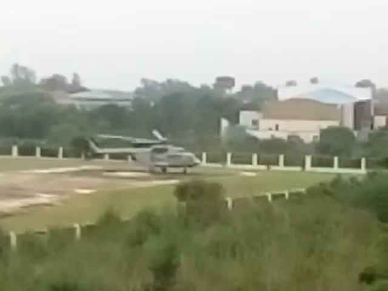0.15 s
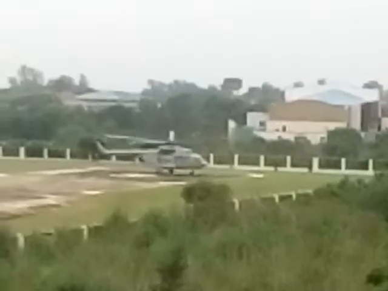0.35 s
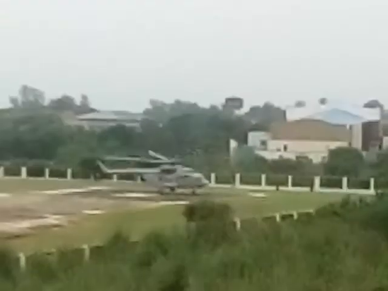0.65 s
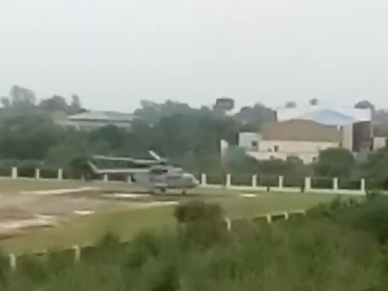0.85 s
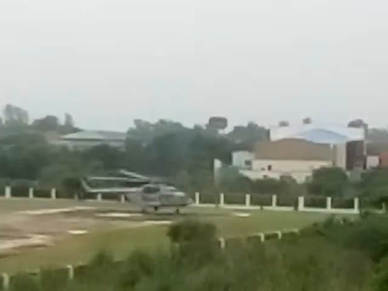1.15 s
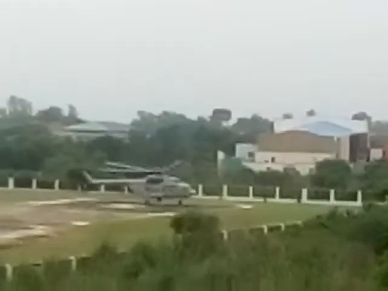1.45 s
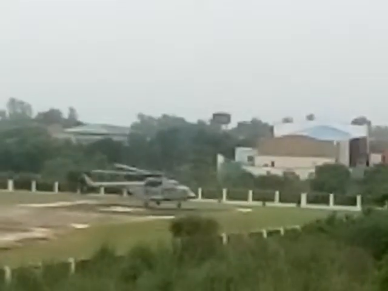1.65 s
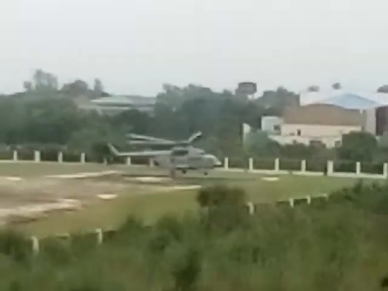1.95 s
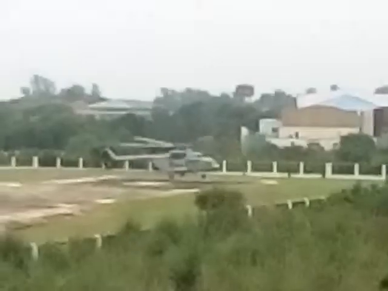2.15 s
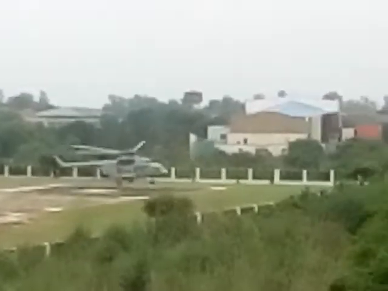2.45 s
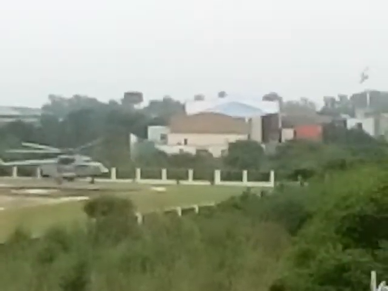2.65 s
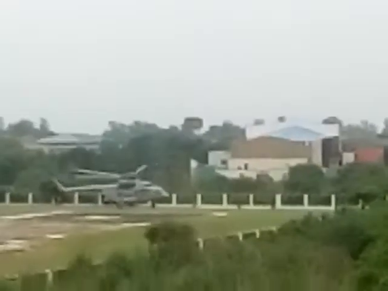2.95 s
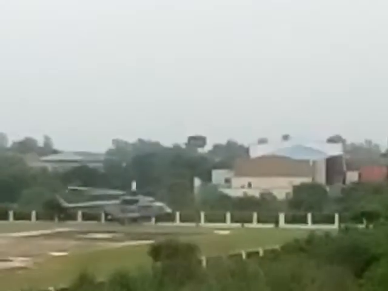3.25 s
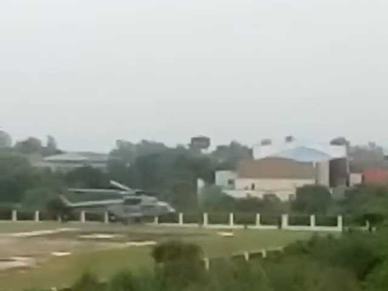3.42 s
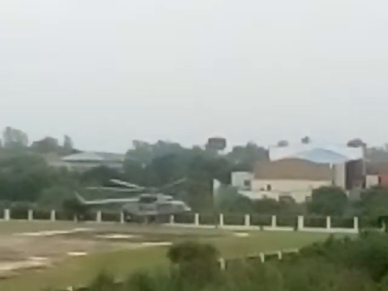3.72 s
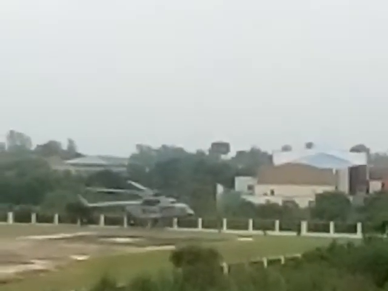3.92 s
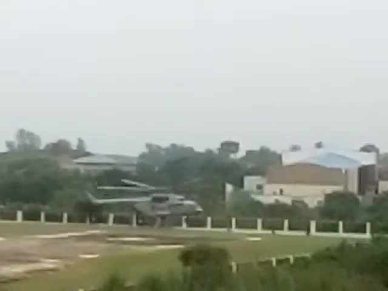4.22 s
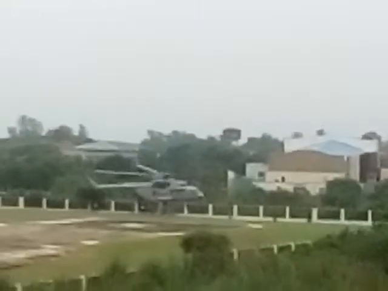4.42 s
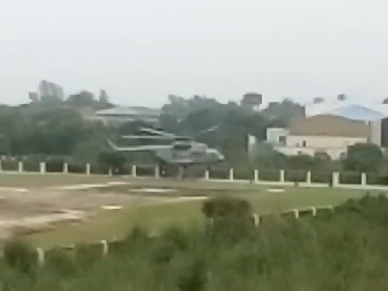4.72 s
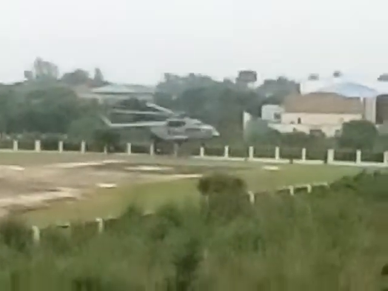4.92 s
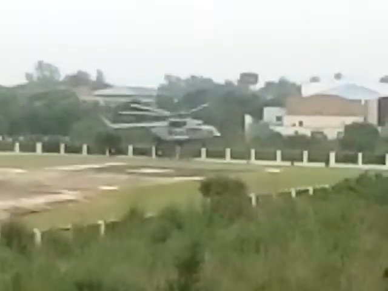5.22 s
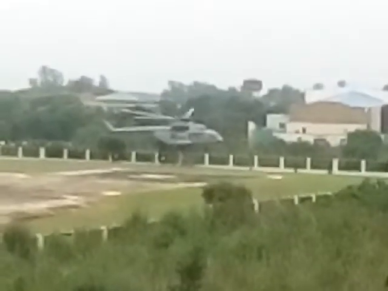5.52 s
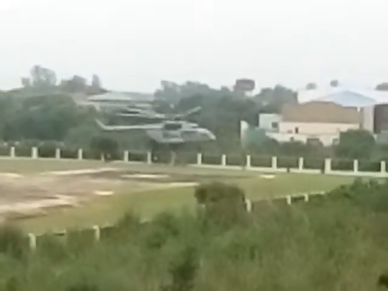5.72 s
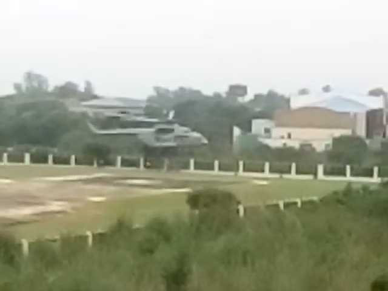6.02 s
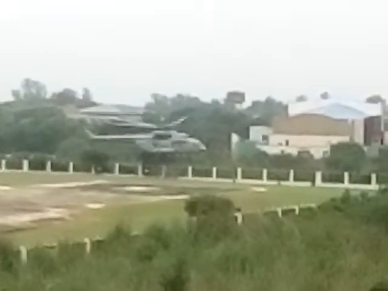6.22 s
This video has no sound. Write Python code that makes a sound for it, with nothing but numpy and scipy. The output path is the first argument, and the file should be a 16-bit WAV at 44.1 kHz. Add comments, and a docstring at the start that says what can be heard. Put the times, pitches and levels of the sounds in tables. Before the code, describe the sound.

A large helicopter idles at some distance in an open field. From 0 to 1 s its rapid throb, about sixteen blade swishes a second, is clear, with a faster tail-rotor flutter, low hum, thin gear whines and soft turbine hiss; a few very faint, falling bird chirps pass. From about 1.2 s wind strikes the microphone, with low rumbling bursts, fluttering edges and short dull thumps, irregular and close, far louder than the machine. Between 2 and 4 s small blade slaps crack through, most clustered around 3.2-3.6 s, and a rasping flare near 3.1 s and a hissy one near 3.55 s swell and sink. From 4.5 s a rounded chopping beat emerges as it lifts off, strongest around 4.8-5.5 s. Roar, whine and hiss then grow brighter and fuller to the end at 6.4 s, under dense, hard wind buffeting, with a few more faint chirps.

```python
"""A heavy helicopter lifts off: main and tail blades modulate coloured noise into a throbbing roar.
Slaps and a beat per blade at lift-off are noise bursts; hum and gears are wavering sines.
Turbine hiss is noise in patchy bands; compressor whistles are smeared sines, and bands of engine noise flare.
Wind noise in gusts and short thumps buffets the microphone; faint bird chirps are falling sines.
"""
import sys
import numpy as np
from scipy import signal
from scipy.fft import rfft, irfft, next_fast_len
from scipy.io import wavfile
from scipy.ndimage import uniform_filter1d, minimum_filter1d

SR = 44100
rng = np.random.default_rng(int(sys.argv[2]) if len(sys.argv) > 2 else 0)


def unload_wav(signal):
    """Save mono or channel-first audio to the path in sys.argv[1] as 16-bit WAV at rate SR, clipped to [-1, 1]."""
    wavfile.write(
        sys.argv[1],
        SR,
        np.round(np.clip(np.atleast_2d(signal).T, -1, 1) * 32767).astype(np.int16),
    )


N = 280917
TIME = np.arange(N) / SR


def undb(db):
    """Decibels to gain."""
    return 10 ** (np.asarray(db) / 20)


def curves(table):
    """Interpolate each column of a (time_s, ..) table at every sample."""
    time_s, *columns = np.transpose(table)
    return [np.interp(TIME, time_s, column) for column in columns]


def unit(x):
    """Scale to rms 1."""
    return x / np.sqrt(np.mean(x ** 2))


def steady(x, size):
    """Level out slow swings: divide by the moving rms over size samples."""
    return x / np.sqrt(uniform_filter1d(x ** 2, size=size) + 1e-9)


def white():
    """White noise of rms 1."""
    return rng.standard_normal(N)


def walk(rate_hz):
    """Smooth random drift of rms 1 through rate_hz knots a second."""
    knots = white()
    drift = np.interp(TIME * rate_hz, np.arange(N), knots)
    return unit(uniform_filter1d(drift, max(int(SR / rate_hz / 2), 1)))


def colour(x, spectrum):
    """Minimum-phase filter with a (freq_hz, level_db) response that keeps the power of white noise."""
    size = 2 * next_fast_len(N // 2 + 4096)
    freq_hz, level_db = np.transpose(spectrum)
    bins_hz = np.maximum(np.arange(size // 2 + 1) * SR / size, 1)
    response_db = np.interp(np.log(bins_hz), np.log(freq_hz), level_db)
    cepstrum = irfft(np.log(unit(undb(response_db))))
    # fold the cepstrum so that the filter is causal
    cepstrum[1:size // 2] *= 2
    cepstrum[size // 2 + 1:] = 0
    response = np.exp(rfft(cepstrum))
    return irfft(rfft(x, size) * response, size)[:N]


# bird calls: start_s, level_db
CHIRPS = [(0.325, -74), (0.64, -70), (0.96, -72), (1.597, -68), (4.733, -67), (4.798, -69), (4.922, -70),
          (5.047, -64), (5.235, -72), (5.362, -73), (5.42, -72), (5.675, -65), (5.745, -61), (5.98, -72),
          (6.052, -70), (6.3, -60.5)]
CHIRP_TOP_HZ, CHIRP_FALL_S, CHIRP_LENGTH_S = 11000, .055, .045
CHIRP_SMEAR_HZ, CHIRP_FLICKER_DB = 420, 4


def chirps():
    """Small bird, faint: sines fall exponentially in pitch, blurred and broken on their way."""
    out = 0
    smear_hz = CHIRP_SMEAR_HZ * walk(1500)
    for start_s, level_db in CHIRPS:
        age_s = np.clip(TIME - start_s, 0, CHIRP_LENGTH_S)
        pitch_hz = CHIRP_TOP_HZ * np.exp(-age_s / CHIRP_FALL_S) + smear_hz
        envelope = np.abs(np.sin(np.pi * age_s / CHIRP_LENGTH_S)) ** .5
        out = out + undb(level_db) * envelope * np.sin(2 * np.pi * np.cumsum(pitch_hz) / SR)
    return out * steady(undb(CHIRP_FLICKER_DB * walk(150)), size=SR // 20)


GUST_ATTACK_S, GUST_RELEASE_S = 0.016, 0.022


def gust(start_s, length_s):
    """Gust envelope: linear attack, hold, exponential release."""
    age_s = TIME - start_s
    attack = np.clip(age_s / GUST_ATTACK_S, 0, 1)
    return attack * np.exp(-np.clip((age_s - length_s) / GUST_RELEASE_S, 0, 20))


# breeze between gusts: time_s, level_db
BREEZE = [(0, -36), (0.3, -49), (1.1, -44), (1.35, -26), (1.48, -26.5), (1.6, -21), (2.0, -22), (2.2, -28),
          (2.5, -20.5), (3.5, -22.5), (3.65, -25), (4.55, -22), (5.05, -32), (5.4, -25.5), (6.37, -22)]
# gusts at the microphone: start_s, length_s, level_db, edge_db (flutter over rumble, before trim)
GUSTS = [(0.925, 0.048, -40, -6), (1.102, 0.066, -32.5, -7), (1.208, 0.073, -17.5, -0.5),
         (1.286, 0.058, -17.5, 0.5), (1.374, 0.05, -23, -8), (1.587, 0.088, -16.5, -1.5),
         (1.68, 0.024, -21, -3), (1.73, .12, -14.5, -2), (1.868, 0.044, -26, -13),
         (2.275, 0.017, -12, -1.5), (2.307, 0.048, -12.5, 1), (2.38, 0.12, -18.5, 6),
         (2.501, 0.047, -14.5, -1), (2.588, 0.02, -14.5, 0), (2.655, .075, -25.5, 4),
         (2.806, 0.028, -16.5, -1), (2.844, 0.036, -12.5, -1.5), (2.909, 0.046, -18, -1),
         (3.048, 0.086, -19.5, 4.5), (3.167, 0.017, -14.5, 0), (3.223, 0.068, -15.5, -1),
         (3.312, 0.054, -16, -3), (3.769, 0.019, -17, 3.5), (3.835, 0.06, -18, -4.5),
         (4.063, 0.15, -20.5, -4), (4.192, 0.091, -19.5, 3.5), (4.313, 0.13, -15.5, 1),
         (4.488, 0.045, -25, -1), (4.758, 0.026, -17.5, -0.5), (4.81, 0.021, -20.5, 11),
         (4.842, 0.017, -23.5, 11), (4.887, 0.028, -15.5, -0.5), (5.104, 0.18, -24, 4.5),
         (5.256, 0.028, -14.5, 0), (5.285, 0.063, -10.5, 3.5), (5.381, 0.056, -16, 6),
         (5.452, 0.13, -19.5, -0.5), (5.71, 0.022, -20, -3), (5.758, 0.024, -18.5, 13.5),
         (5.907, 0.11, -14.5, 3), (6.012, 0.06, -10, 3.5), (6.072, 0.027, -14.5, -1.5),
         (6.151, 0.032, -17.5, 4.5), (6.22, 0.039, -18.5, 6), (6.29, 0.032, -13, 4),
         (6.329, 0.053, -13.5, 8.5)]
# rumble spectrum: freq_hz, relative_db (per Hz)
RUMBLE = [(22, -12), (38, -23), (60, -10), (90, -1), (150, 4), (250, 0.5), (400, -6), (600, -16),
          (1000, -33), (2500, -56.5), (9000, -86.5)]
# flutter spectrum: freq_hz, relative_db (per Hz)
FLUTTER = [(60, -25.5), (200, 2), (350, 0), (550, -3.5), (900, -11.5), (1400, -24.5), (2500, -37.5),
           (9000, -86)]
BREEZE_EDGE_DB = -1  # flutter over rumble, before trim


def wind():
    """Eddies over the microphone port: deep rumble, and brighter flutter where they tear."""
    breeze_db, = curves(BREEZE)
    flows = [(undb(breeze_db), BREEZE_EDGE_DB)]
    for start_s, length_s, level_db, edge_db in GUSTS:
        flows.append((undb(level_db) * gust(start_s, length_s), edge_db))
    # flows add in power, which also weights their edge
    power = sum(flow ** 2 for flow, _ in flows)
    edge_db = sum(flow ** 2 * edge for flow, edge in flows) / power
    eddies = steady(undb(1.3 * walk(70) + 1.5 * walk(220)), size=SR // 40)
    pressure = np.sqrt(power) * eddies
    rumble = steady(colour(white(), RUMBLE), size=SR // 40) * undb(-1.2 - edge_db / 2)
    flutter = steady(colour(white() * eddies ** 1.6, FLUTTER), size=SR // 50) * undb(-6.0 + edge_db)
    return pressure * (rumble + flutter) * undb(0.5 * walk(16))


# single eddies at the microphone: centre_s, level_db, pitch_hz
THUMPS = [(0.833, -14, 400), (1.264, -8.5, 380), (1.325, -11, 230), (1.408, -11.5, 296), (1.564, -5.5, 230),
          (1.642, -7, 350), (1.771, -6, 310), (1.782, -8, 520), (2.299, -6, 260), (2.334, -8, 656),
          (2.351, -10, 400), (2.489, -4.5, 268), (2.547, -13.5, 600), (2.608, -9, 200), (2.63, -10.5, 235),
          (2.778, -5, 230), (2.823, -11, 239), (2.866, -3.5, 390), (2.877, -8.5, 266), (2.954, -8, 290),
          (3.073, -5.5, 330), (3.244, -5, 230), (3.279, -4.5, 264), (3.328, -9.5, 267), (3.472, -12.5, 300),
          (3.844, -11.5, 283), (3.986, -14, 140), (4.095, -8, 387), (4.379, -8.5, 295), (4.4, -8.5, 485),
          (4.825, -10.5, 815), (4.904, -6.5, 250), (5.289, -8, 483), (5.31, -5, 288), (5.332, -11, 288),
          (5.337, -4, 750), (5.347, -12, 350), (5.362, -7, 292), (5.424, -4, 318), (5.509, -8, 270),
          (5.593, -11, 295), (5.638, -11, 200), (5.731, -6.5, 307), (5.777, -13, 440), (5.926, -9, 355),
          (5.96, -8, 560), (6.024, -6, 520), (6.05, -6.5, 420), (6.066, -6.5, 390), (6.099, -5, 284),
          (6.137, -9, 210), (6.165, -8.5, 263), (6.269, -9, 414), (6.319, -9, 300), (6.352, -3, 420)]
THUMP_CYCLES = .75  # half-width at 1/e


def thumps():
    """A lone eddy rocks the diaphragm for a cycle or two: a sine under a Gaussian."""
    out = 0
    for centre_s, level_db, pitch_hz in THUMPS:
        cycles = (TIME - centre_s) * pitch_hz
        envelope = np.exp(-np.minimum((cycles / THUMP_CYCLES) ** 2, 50))
        out = out + undb(level_db) * np.sin(2 * np.pi * cycles) * envelope
    return out


def tone(pitch_hz, waver_hz):
    """A sine whine that wavers in pitch and fades in and out."""
    wavering_hz = pitch_hz * (1 + 0.000708 * walk(3)) + waver_hz * walk(60)
    turns = np.cumsum(wavering_hz) / SR
    fading = undb(2.6 * walk(14) + 1.5 * walk(60))
    return unit(np.sin(2 * np.pi * turns) * fading)


def whistle(pitch_hz):
    """Turbulent air smears a compressor tone into a narrow, grainy band that comes and goes."""
    turns = np.cumsum(pitch_hz + 85 * walk(500)) / SR
    fading = undb(2.6 * walk(90) + 2.2 * walk(16) - 2.5)
    return np.sqrt(2) * np.sin(2 * np.pi * turns) * fading


FADE_BAND_HZ, FADE_RATE_HZ, FADE_DB = 500, 11, 1.7


def patchy(x):
    """Moving air fades overlapping treble bands separately."""
    size = next_fast_len(N)
    spectrum = rfft(x, size * 2)
    freq_hz = np.linspace(0, SR / 2, size + 1)
    out = x
    for centre_hz in np.arange(3500, 7500, FADE_BAND_HZ):
        triangle = np.maximum(1 - np.abs(freq_hz - centre_hz) / FADE_BAND_HZ, 0)
        band = irfft(spectrum * triangle)[:N]
        out = out + band * (undb(FADE_DB * walk(FADE_RATE_HZ)) - 1)
    return out


# gearbox and compressor tones: ground_hz, air_hz, ground_db, air_db
WHINE = [(900, 900, -51, -49), (990, 990, -51, -49), (1690, 1680, -72, -57), (1834, 1834, -53, -66),
         (2056, 2056, -70, -58), (2480, 2480, -59, -57), (3660, 3748, -68, -63), (5636, 5636, -75, -62)]
# compressor blade tone: time_s, pitch_hz, level_db (before fading)
SPOOL = [(0, 11240, -74), (1.1, 11450, -75), (1.3, 11500, -84), (2.0, 11660, -83), (2.3, 11730, -78),
         (3.5, 11680, -80), (3.8, 11660, -85), (4.4, 11620, -82), (5.0, 11650, -76), (5.8, 11700, -74),
         (6.4, 11670, -79)]
# hiss spectrum: freq_hz, relative_db (per Hz)
HISS = [(2000, -4.5), (3700, 0.5), (4250, -6.5), (4800, -4.5), (5150, -0.5), (5400, 1.5), (5700, 2.5),
        (6350, -6), (6550, -11.5), (6900, -16.5), (8000, -24), (9000, -26.5), (10200, -27.5),
        (12000, -31.5), (15000, -43.5)]
NEXT_STAGE_RATIO, NEXT_STAGE_DB = 1.103, -14  # next compressor stage: more blades, higher whistle


def engines(hiss_db):
    """Turbine hiss, compressor whistles, and gear tones that change weight as the machine lifts off."""
    # time_s, airborne share
    airborne, = curves([(2.0, 0.13), (3.0, 0.46), (4.5, 0.47), (5.0, 1)])
    spool_hz, spool_db = curves(SPOOL)
    gears = 0
    for ground_hz, air_hz, ground_db, air_db in WHINE:
        pitch_hz = ground_hz + airborne * (air_hz - ground_hz)
        level_db = ground_db + airborne * (air_db - ground_db)
        gears = gears + tone(pitch_hz, waver_hz=8.76) * undb(level_db)
    hiss = patchy(colour(white() * undb(1.6 * walk(150)), HISS))
    hiss = hiss * undb(hiss_db + 3.0 + 1.0 * walk(30))
    compressor = whistle(spool_hz) + undb(NEXT_STAGE_DB) * whistle(NEXT_STAGE_RATIO * spool_hz)
    return gears + hiss + undb(spool_db) * compressor


TAIL_PER_MAIN = 3.5  # tail blade passes per main blade pass
# tail rotor hum: multiple (of its blade rate), level_db (before fading)
TAIL_HUM = [(2, -43.5), (3, -47.5), (4, -44), (6, -44), (7, -46.5), (9, -49)]


def tail_hum(phase):
    """Low harmonics of the tail rotor, fading in and out with the air."""
    out = 0
    for multiple, level_db in TAIL_HUM:
        fading = undb(level_db + 0.71 * walk(11.0))
        angle = 2 * np.pi * multiple * TAIL_PER_MAIN * phase + .5 * walk(13.0)
        out = out + fading * np.sqrt(2) * np.sin(angle)
    return out


def swish(phase, rise, fall):
    """Once a blade: swells as it advances, fades as it turns away (rise, fall in cycles)."""
    cycle = phase % 1
    return np.exp(-cycle / fall) + np.exp((cycle - 1) / rise)


# engine sound carried over by the wind:
# centre_s, length_s (half-width at 1/e), centre_hz, width_hz, level_db, chopped (tail rotor share, 0-1)
FLARES = [(3.06, 0.085, 950, 270, -31, .9), (3.08, .27, 4550, 900, -60, 0), (3.55, 0.09, 4950, 800, -54, 0),
          (3.89, .04, 4400, 800, -57, 0), (5.945, 0.035, 5625, 80, -50, 0), (6.05, .08, 5650, 110, -56, 0)]


def flares(phase):
    """Narrow noise bands, whine or tail rotor rasp, that swell and sink again."""
    rasp = unit(swish(TAIL_PER_MAIN * phase, rise=.12, fall=.2))
    out = 0
    for centre_s, length_s, centre_hz, width_hz, level_db, chopped in FLARES:
        band_shape = [(centre_hz - 1.5 * width_hz, -90), (centre_hz - width_hz / 2, 0),
                      (centre_hz + width_hz / 2, 0), (centre_hz + 1.5 * width_hz, -90)]
        band = steady(colour(white(), band_shape), size=SR // 50)
        swell = undb(level_db) * np.exp(-((TIME - centre_s) / length_s) ** 2)
        out = out + swell * band * (1 + chopped * (rasp - 1))
    return out


def burst(start_s, rise_s, fall_s):
    """Envelope with a linear rise and an exponential fall, top 1."""
    age_s = np.maximum(TIME - start_s, 0)
    return np.minimum(age_s / rise_s, 1) * np.exp(-np.clip((age_s - rise_s) / fall_s, 0, 20))


# a blade cuts a stray vortex: start_s, level_db
SLAPS = [(1.95, -26), (2.478, -26.5), (2.68, -28.5), (2.923, -26.5), (3.159, -26), (3.231, -26.5),
         (3.28, -22), (3.404, -22), (3.599, -21.5), (3.921, -25.5)]
# slap spectrum: freq_hz, relative_db (per Hz)
SLAP_COLOUR = [(200, -7), (900, 14), (1600, -5), (2600, 5.5), (3800, -13), (9000, -57)]
SLAP_RISE_S, SLAP_FALL_S = 0.0019, 0.0033


def slaps():
    """Stray cracks of blade on vortex: short bursts of coloured noise."""
    strays = sum(undb(level_db) * burst(start_s, SLAP_RISE_S, SLAP_FALL_S) for start_s, level_db in SLAPS)
    return colour(white() * strays, SLAP_COLOUR)


# blade beats at lift-off: time_s, level_db
CHOP = [(4.2, -60), (4.48, -37), (4.66, -38), (4.78, -29.5), (4.86, -34), (4.98, -33), (5.05, -29),
        (5.48, -29), (5.55, -32.5), (5.75, -35), (5.85, -40), (6.37, -40)]
# chop spectrum: freq_hz, relative_db (per Hz)
CHOP_COLOUR = [(200, -5.5), (600, 6.5), (950, 7), (1200, -5.5), (1350, -7.5), (1680, 0), (1880, -7),
               (2060, 1.5), (2250, -6.5), (2480, 6), (3000, -5), (3550, -23.5), (3850, -17), (9000, -54)]
CHOP_AT_CYCLE, CHOP_WIDTH_S = .072, .0095  # half-width at 1/e


def chop(phase):
    """At lift-off every blade cuts the vortex of the one before: an even, rounded noise beat."""
    chop_db, = curves(CHOP)
    offset_cycles = (phase - CHOP_AT_CYCLE + .5) % 1 - .5
    offset_s = offset_cycles / np.gradient(phase) / SR
    beat = np.exp(-(offset_s / CHOP_WIDTH_S) ** 2)
    return steady(colour(white(), CHOP_COLOUR), size=SR // 200) * beat * undb(chop_db)


# blade bite: time_s, swish_db (relative to the churn, before trim)
BITE = [(0, -5.5), (1.1, -5.5), (2.0, -8), (3.2, -4), (4.3, -5), (4.8, -5), (5.4, -5), (5.8, -6.5),
        (6.3, -7)]
# churn spectrum: freq_hz, relative_db (per Hz)
ROAR = [(30, -28), (55, -11), (100, 4), (200, 1), (500, 1.5), (780, -7), (950, -4.5), (1250, -13.5),
        (1600, -22), (2000, -17.5), (2150, -15.5), (2270, -20.5), (2450, -12.5), (2950, -16), (3600, -33),
        (9000, -65.5)]
# swish spectrum: freq_hz, relative_db (per Hz)
SWISH = [(40, -12.5), (200, -2), (550, 3.5), (760, -4), (950, 0), (1300, -14), (1650, -15.5), (2150, -18.5),
         (2500, -9), (2950, -21), (3600, -29), (9000, -62)]
TAIL_CHOP_DB = 1  # tail swish over the steady part


def rotors(phase, roar_db):
    """Steady churn of downwash plus a swish per main blade; the tail rotor chops both."""
    bite_db, = curves(BITE)
    # no two blade passes bite equally hard
    passes = undb(.7 * white()[(phase + 1.5).astype(int)])
    blade = unit(swish(phase - .03, rise=.11, fall=.22))
    tail = np.hypot(1, undb(TAIL_CHOP_DB) * swish(TAIL_PER_MAIN * phase, rise=0.087, fall=0.27))
    # turbulent air on the way roughens the level
    air = steady(tail * undb(1.2 * walk(300)), size=SR // 25)
    churn = colour(white() * air, ROAR) * undb(11.0)
    swishes = colour(white() * air * blade * passes * undb(bite_db), SWISH) * undb(10)
    # a harder bite gives the swish a larger share of the roar
    return (churn + swishes) * undb(roar_db + 3.5) / np.hypot(1, undb(bite_db))


# rotor speed: time_s, blade_hz (main blade passes)
BLADE_RATE = [(0, 15.8), (2.7, 15.8), (2.9, 16.0), (6.4, 16.0)]
# rotor load: time_s, roar_db, hiss_db (both before trim)
LOAD = [(0.1, -44.5, -57.5), (0.77, -43, -57.5), (1.1, -44.5, -57), (1.4, -43.5, -58), (1.8, -45.5, -60),
        (2.6, -43.5, -60), (2.8, -44, -58.5), (3.22, -43, -58), (3.4, -43, -61), (3.56, -44, -54),
        (3.78, -44.5, -60.5), (3.89, -43, -58), (4.0, -44, -60), (4.4, -44, -59.5), (4.9, -42, -55.5),
        (5.35, -42, -53.5), (6.07, -39.5, -52.5), (6.2, -40, -54), (6.35, -39, -52)]
BLADE_START_CYCLES = -.1


def scene():
    """Mix bird, wind and helicopter; one main blade phase drives all rotor sounds."""
    blade_hz, = curves(BLADE_RATE)
    phase = BLADE_START_CYCLES + np.cumsum(blade_hz) / SR
    roar_db, hiss_db = curves(LOAD)
    machinery = engines(hiss_db) + tail_hum(phase) + flares(phase)
    blades = slaps() + chop(phase) + rotors(phase, roar_db)
    return (chirps() + wind() + thumps() + machinery + blades)[None]


TOP_HZ = 15500


def record(dry):
    """A limiter ducks the highest peaks, then a low-pass cuts the top."""
    ceiling = .92
    gain = minimum_filter1d(ceiling / np.maximum(np.abs(dry), ceiling), size=441)
    gain = uniform_filter1d(uniform_filter1d(gain, size=220), size=220)
    low_pass = signal.ellip(8, .2, 70, TOP_HZ, fs=SR, output="sos")
    return signal.sosfilt(low_pass, dry * gain)


dry = scene()
out = record(dry)
unload_wav(out)
```